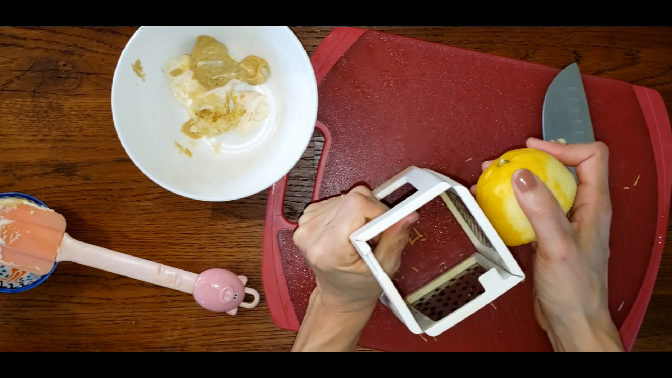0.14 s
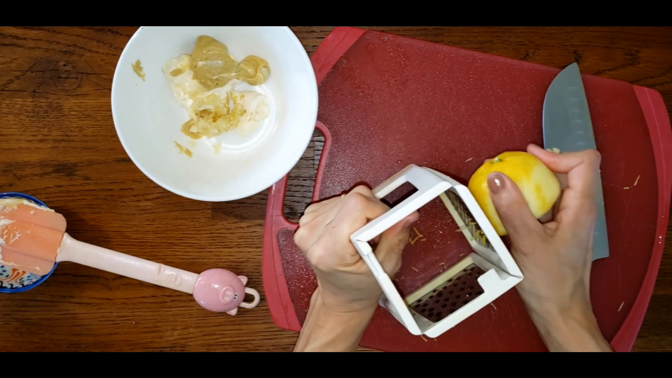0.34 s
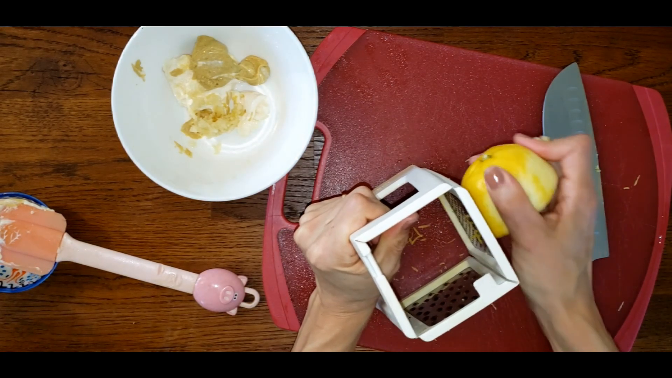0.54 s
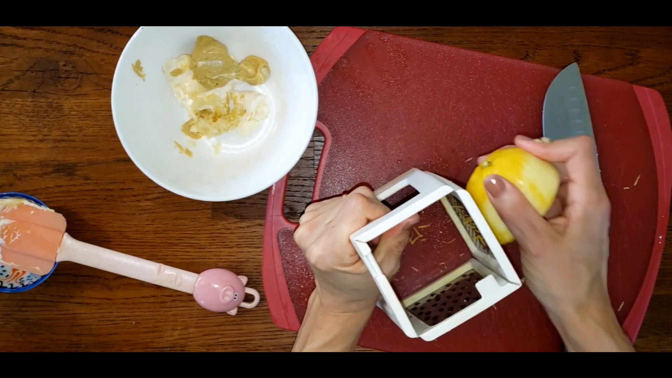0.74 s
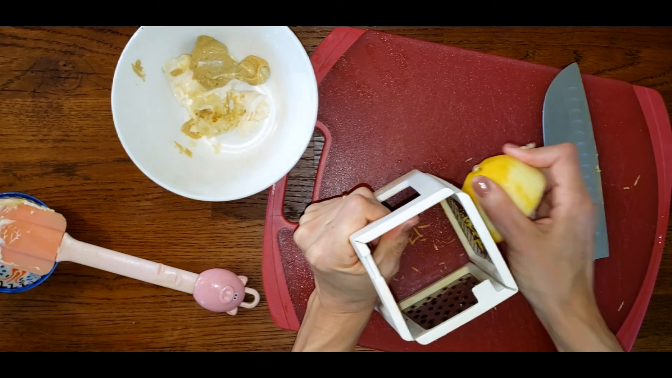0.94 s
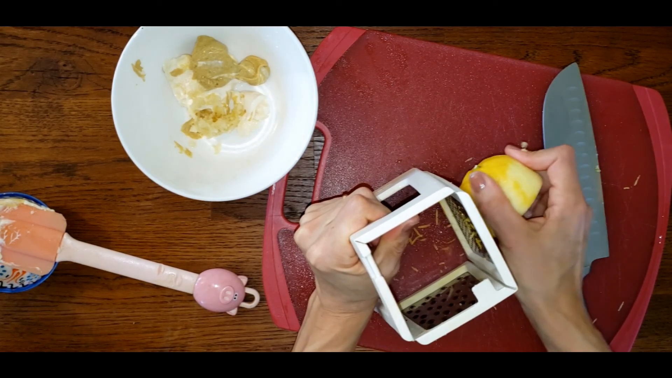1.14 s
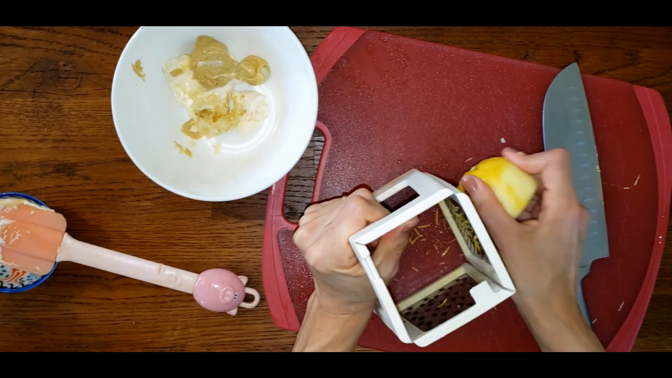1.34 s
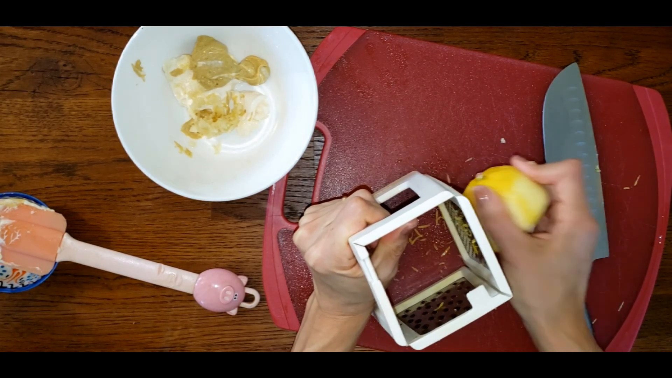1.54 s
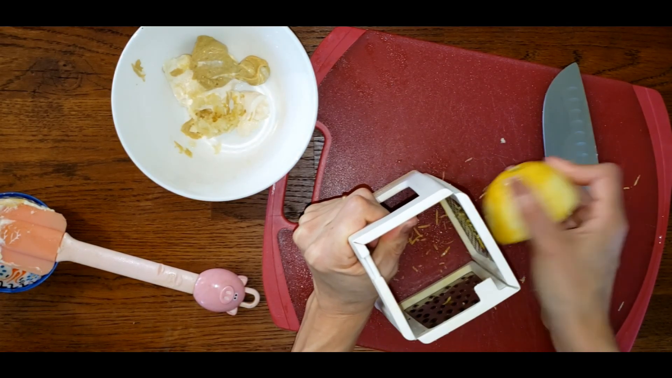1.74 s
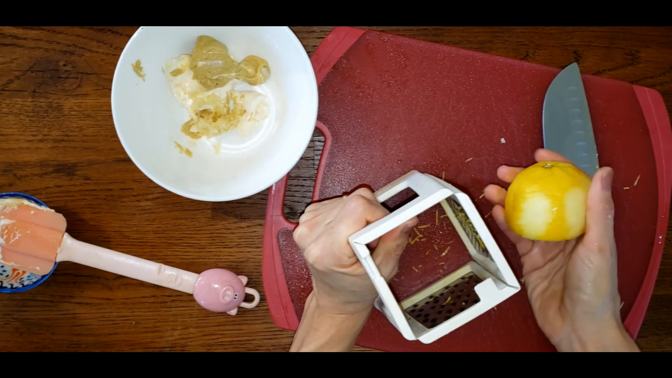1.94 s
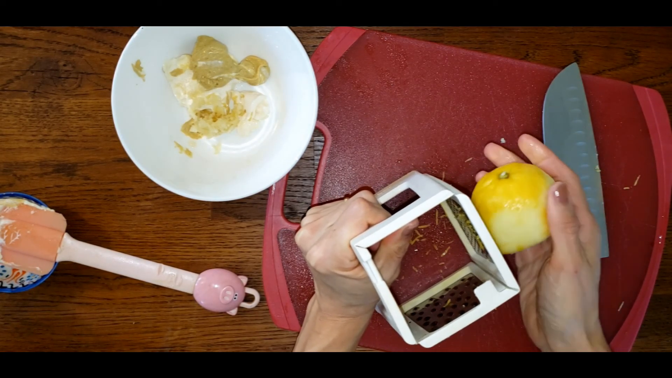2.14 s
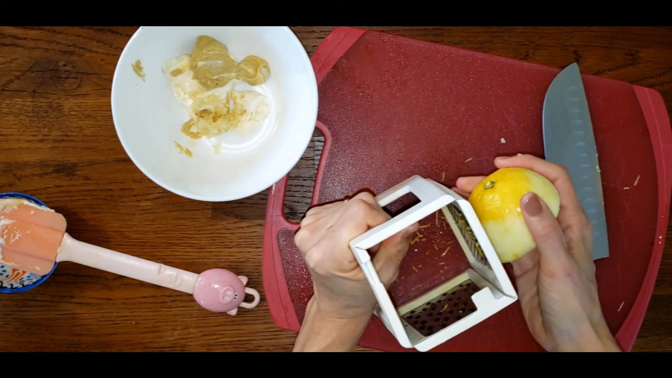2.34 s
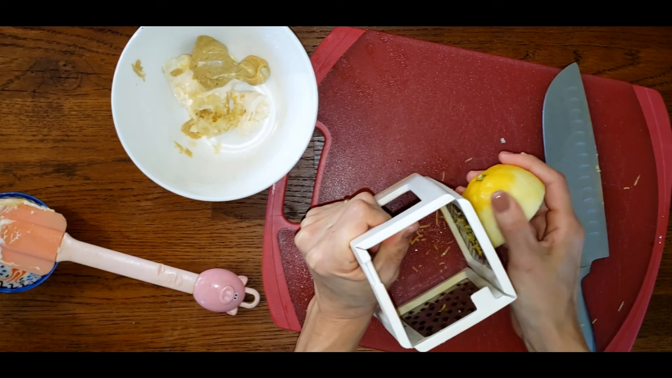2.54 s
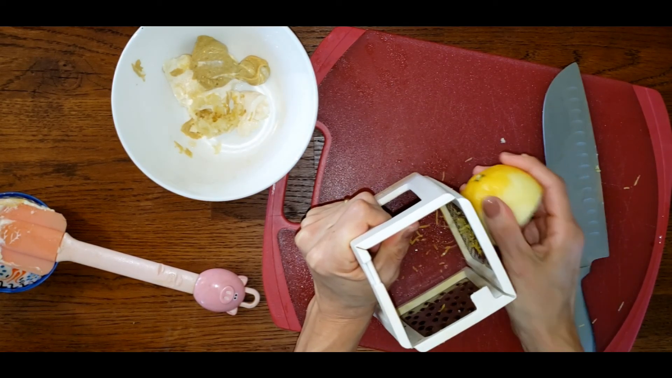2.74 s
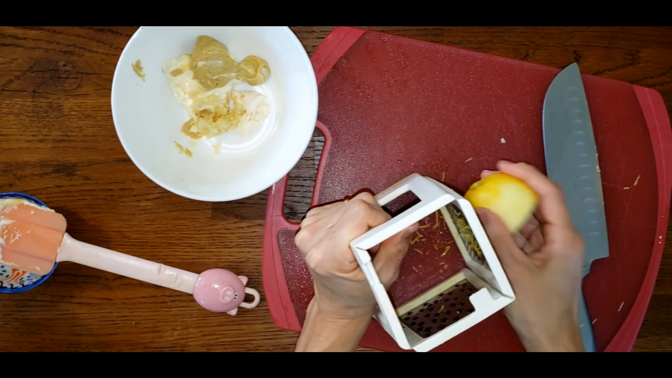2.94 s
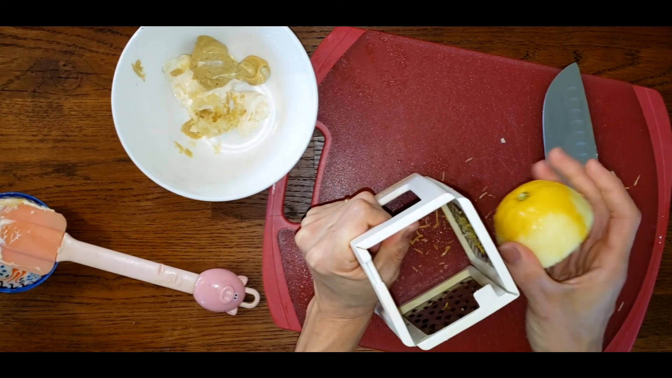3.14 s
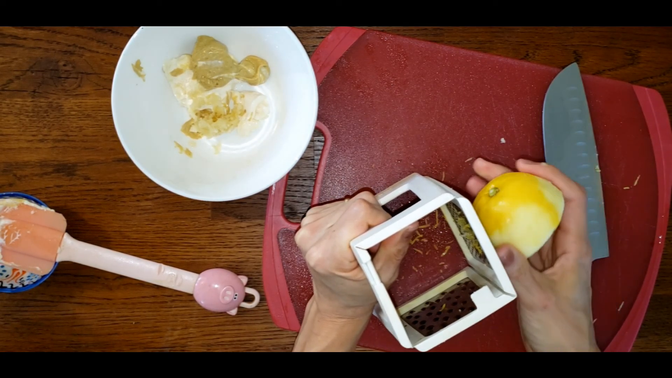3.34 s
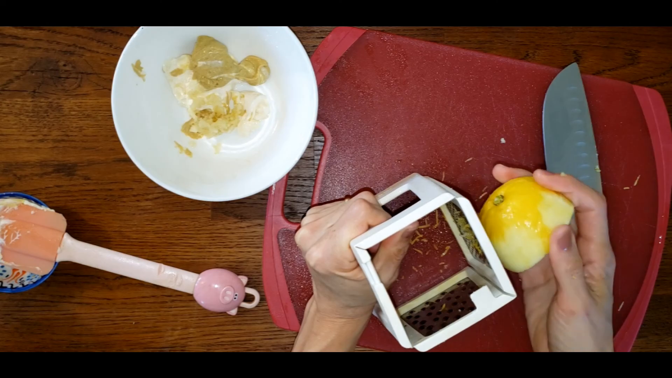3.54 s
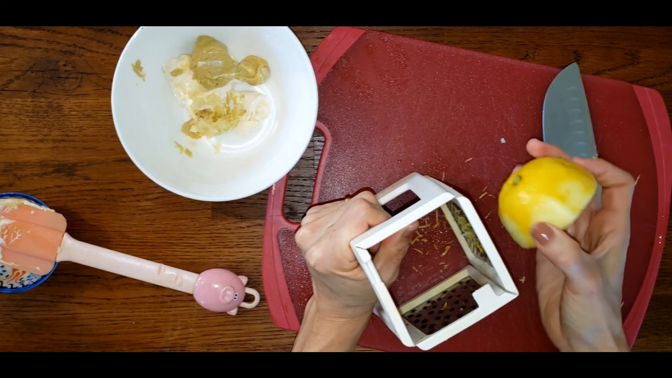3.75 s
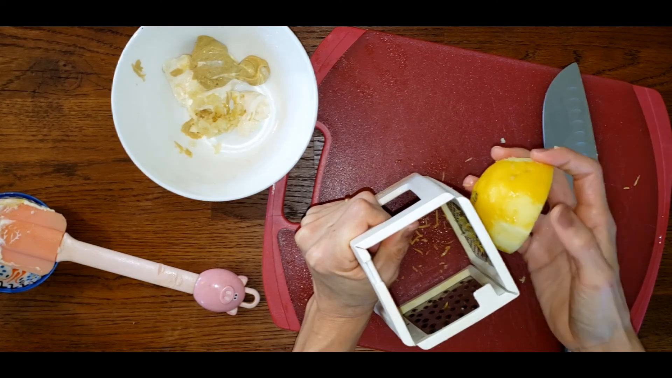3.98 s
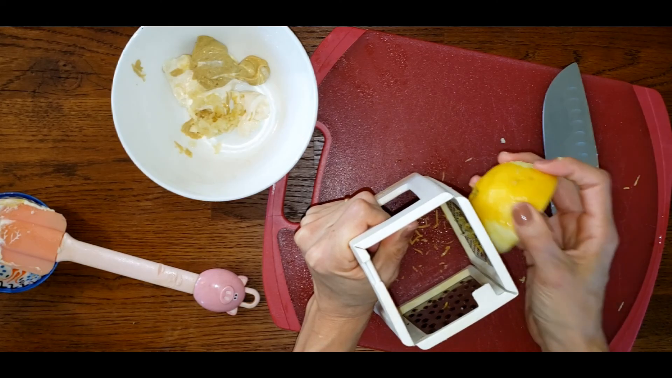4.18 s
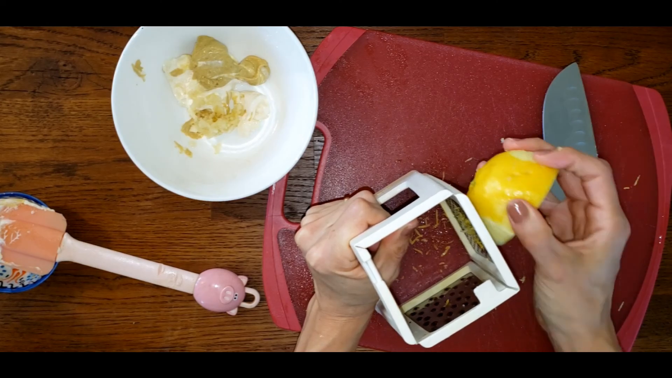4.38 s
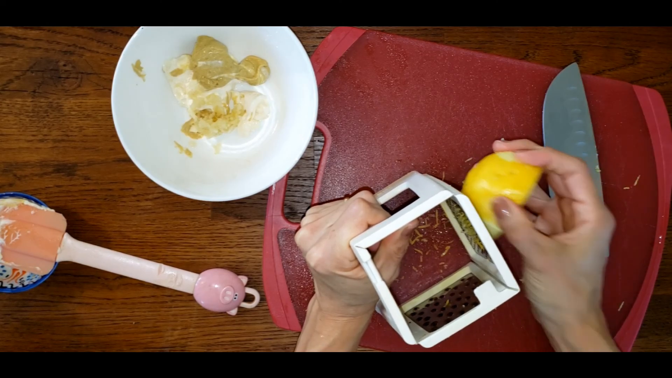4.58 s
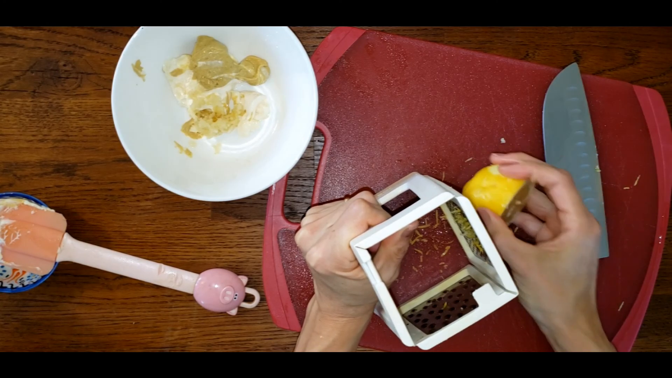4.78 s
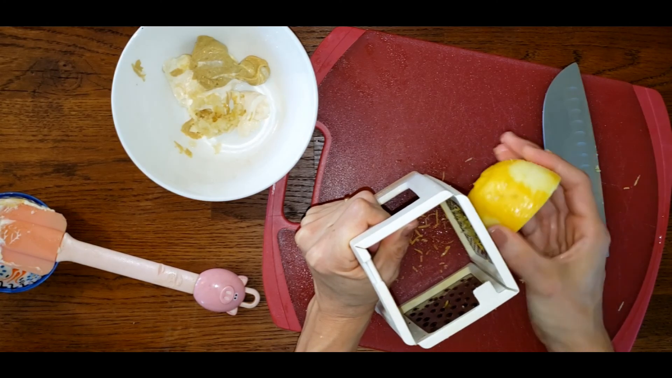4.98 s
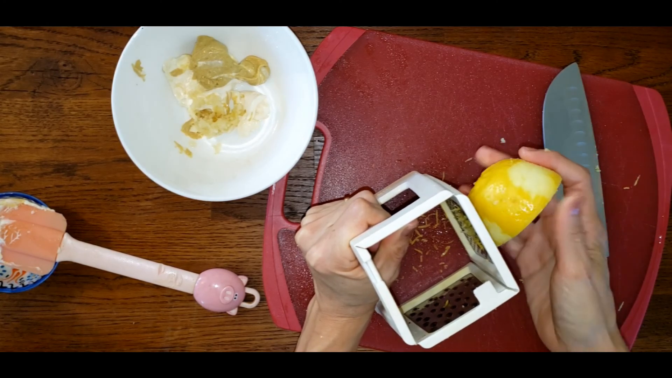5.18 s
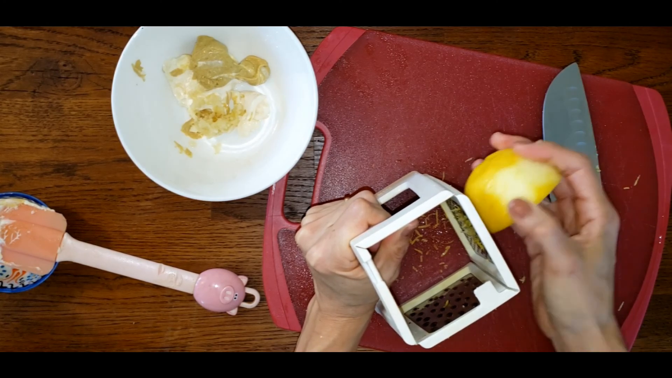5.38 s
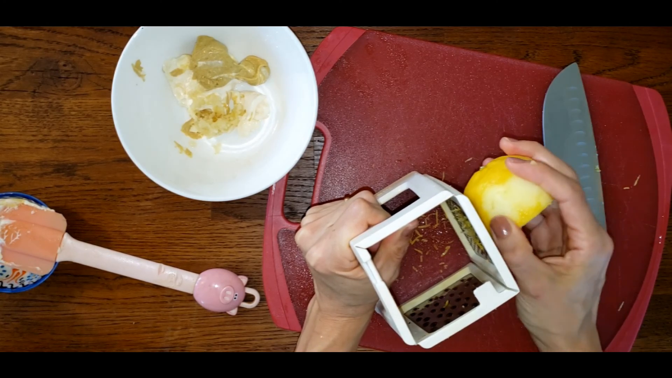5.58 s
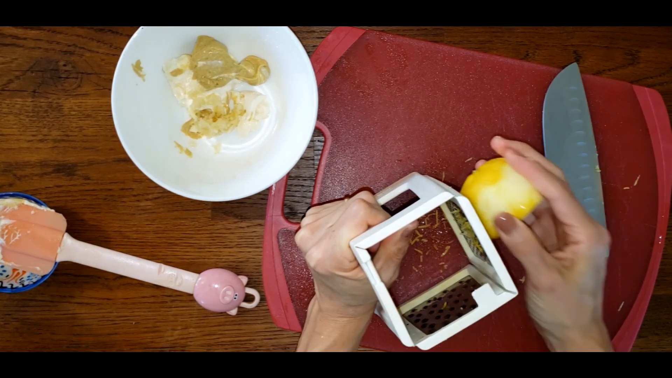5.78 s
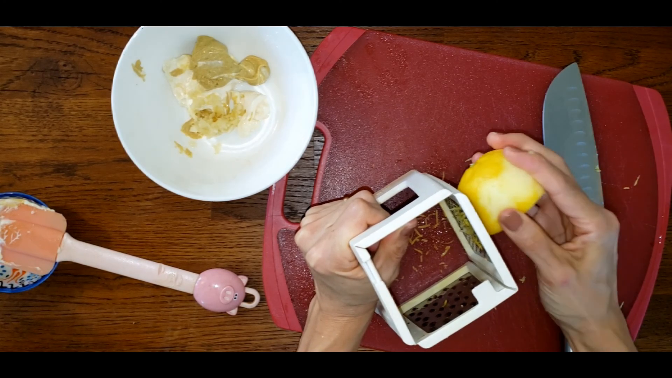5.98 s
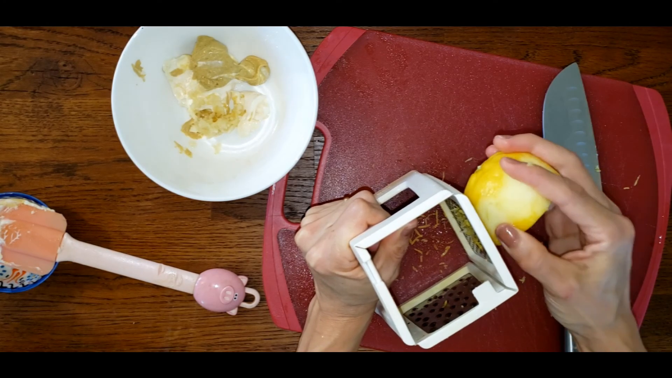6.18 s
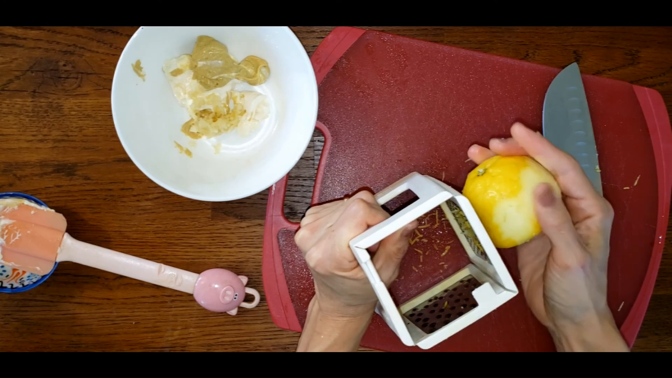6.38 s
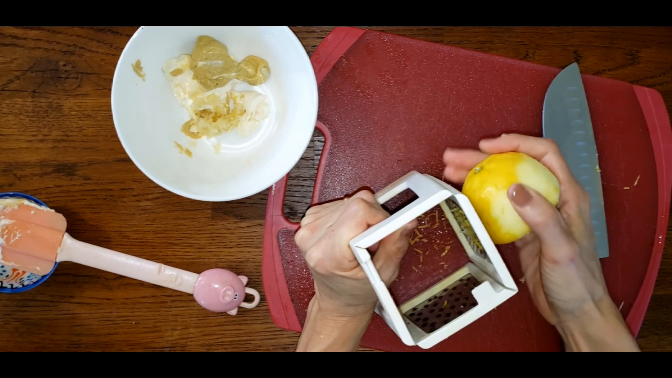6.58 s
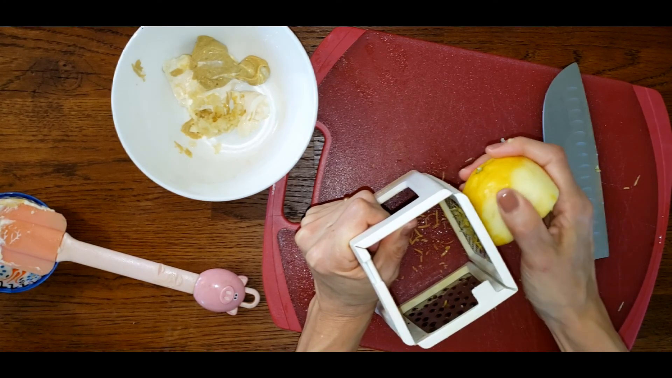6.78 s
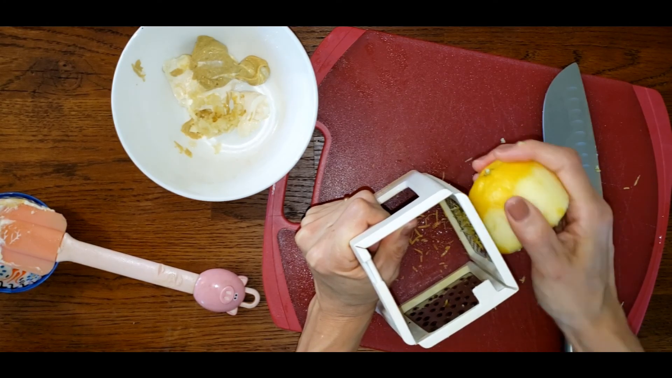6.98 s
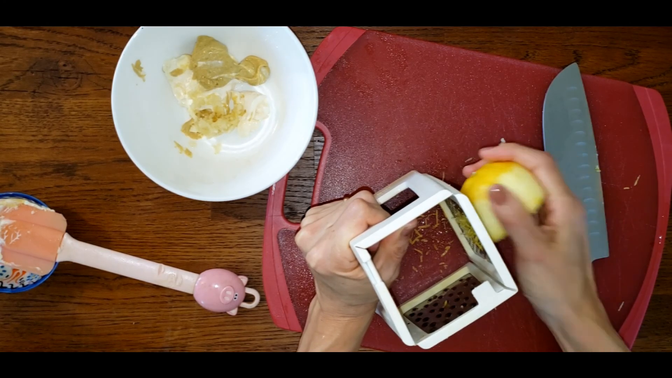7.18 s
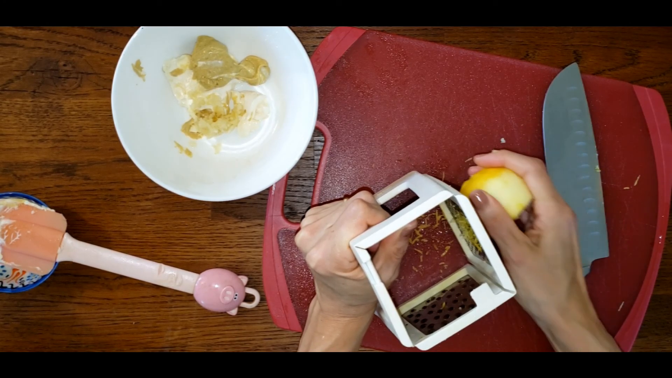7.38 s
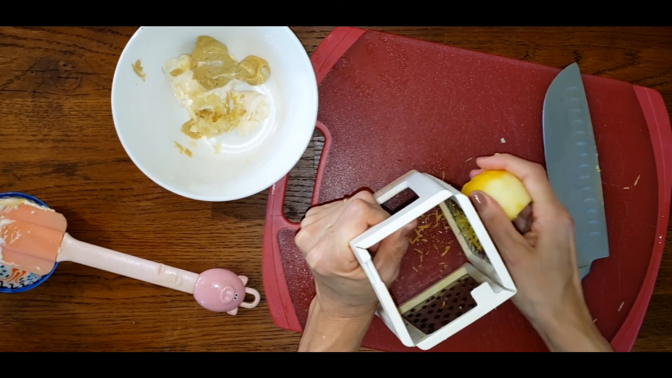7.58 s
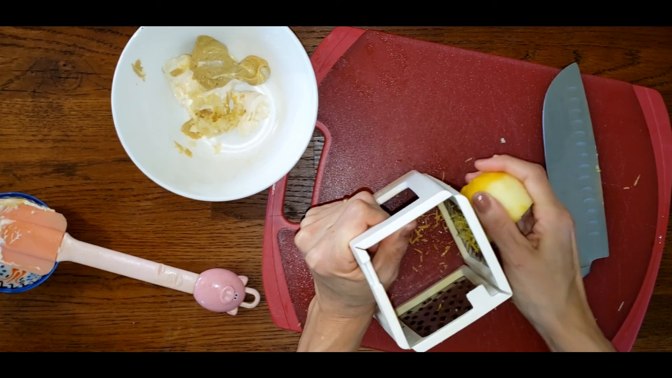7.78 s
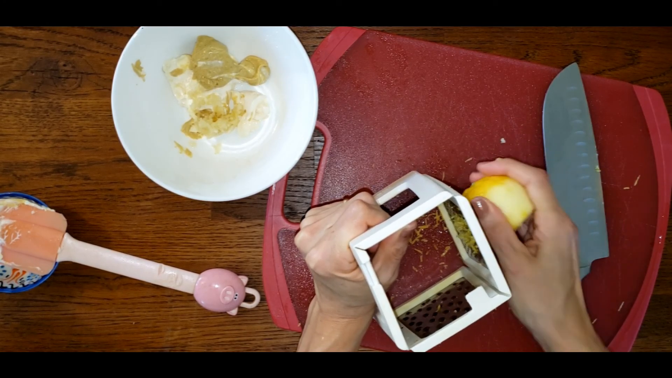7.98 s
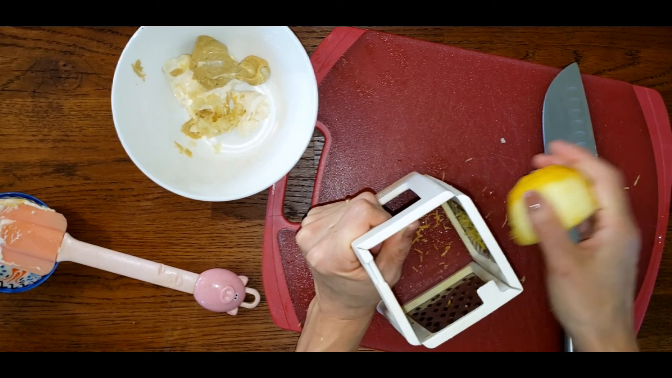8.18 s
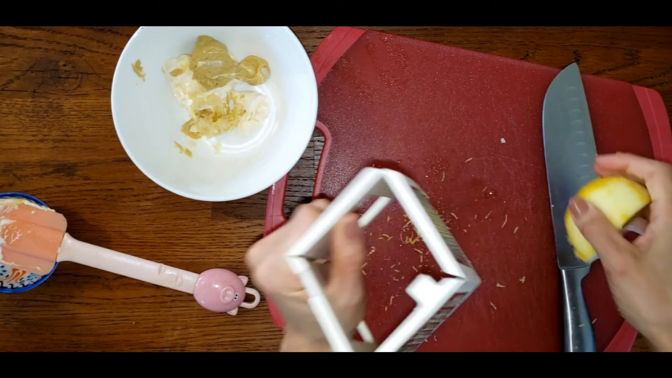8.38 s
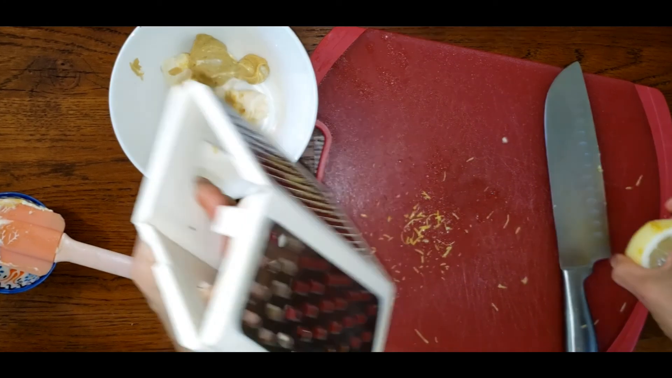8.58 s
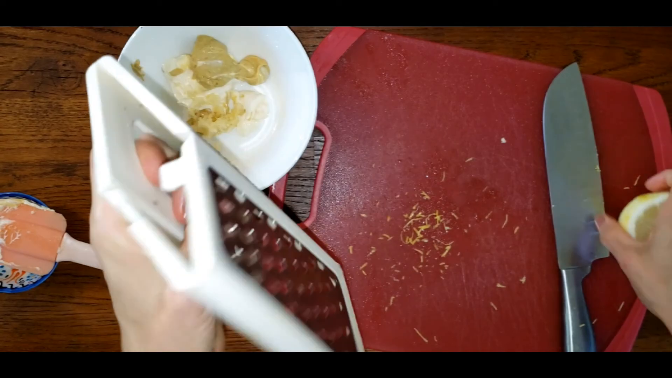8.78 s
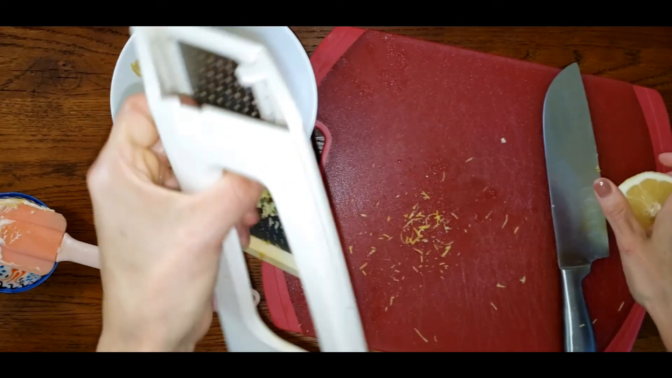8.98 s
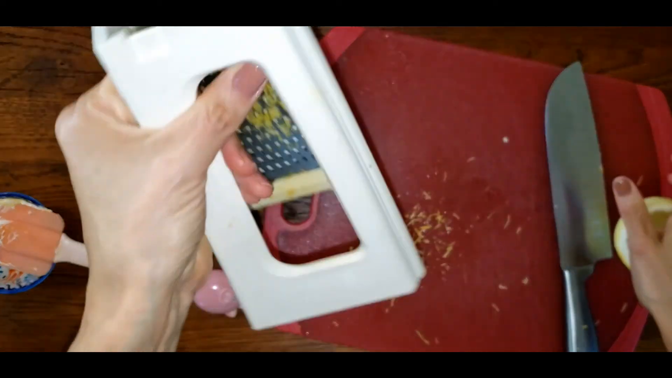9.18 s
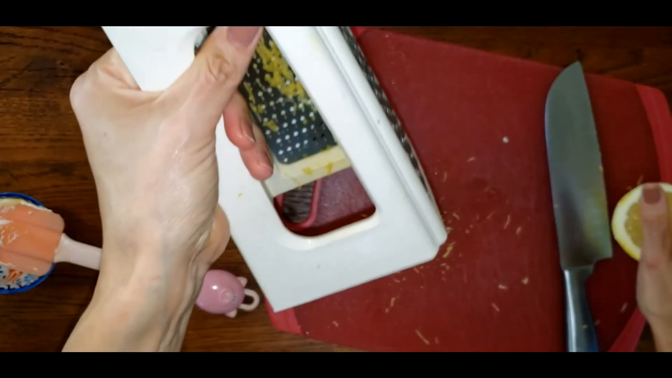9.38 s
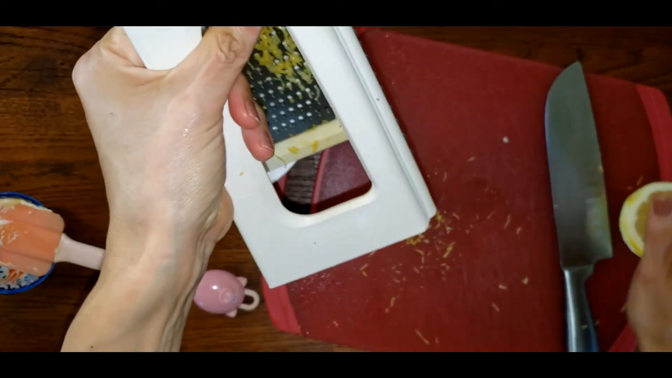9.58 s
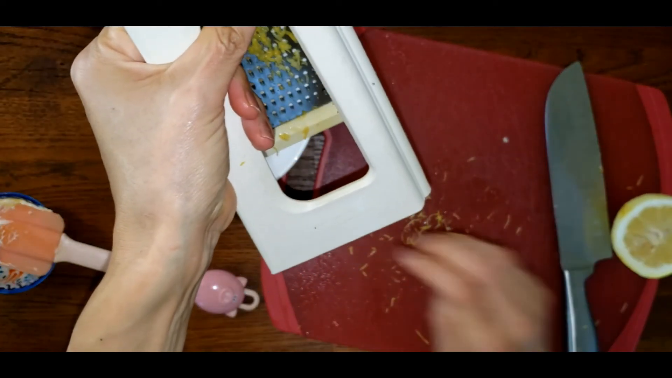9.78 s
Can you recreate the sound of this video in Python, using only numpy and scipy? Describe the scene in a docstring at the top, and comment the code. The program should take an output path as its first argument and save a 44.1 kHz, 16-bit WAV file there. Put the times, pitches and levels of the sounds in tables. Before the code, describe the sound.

Close, crisp scrapes of lemon rind against a steel grater come about four a second, in bursts broken by short pauses with soft bumps and sticky handling. The grater and the board beneath it resonate dully with each stroke. After the last run the fruit lands on the board with a single thud that rattles a knife, followed by a few light plastic ticks. Faint rumble, hiss and a fan tone fill the small kitchen.

```python
"""A lemon is zested on a box grater that stands on a plastic cutting board in a small kitchen.
In each stroke wet peel sticks, oil cells burst and the teeth tear the rind, while their tugging drives
the modes of box and board; the lemon then slides back lightly. Between bouts, fingers turn the fruit.
Near the end it lands on the board and jolts a knife into ringing; last, the grater's frame ticks.
Room rumble, hiss and a faint fan tone lie under it all."""
import sys
import numpy as np
from scipy import signal
from scipy.fft import rfft, irfft
from scipy.io import wavfile
from scipy.ndimage import uniform_filter1d

SR = 44100
rng = np.random.default_rng(int(sys.argv[2]) if len(sys.argv) > 2 else 0)


def store_pcm(level_fs):
    """Save levels as 16-bit WAV."""
    pcm = np.round(np.clip(level_fs, -1, 1) * 32767).astype(np.int16)
    wavfile.write(sys.argv[1], SR, np.atleast_2d(pcm).T)


N = 433503
TIME = np.arange(N) / SR

# strokes down the teeth: start_s, length_s, force_db, slide_back_force_db
STROKES = [(-.09, .15, -43, -75), (0.261, .17, -39, -60), (.594, .11, -31.3, -50.5),
           (0.849, 0.11, -30.5, -44), (1.096, .11, -30, -48), (1.34, .12, -26.3, -38.5),
           (1.576, 0.12, -28, -56), (2.495, .13, -34, -47), (2.733, .12, -27.5, -39.5),
           (2.948, 0.094, -25.5, -58), (4.257, .04, -34.5, -75), (4.294, .085, -29.8, -53),
           (4.506, 0.12, -27, -38), (4.738, .12, -27, -46.5), (5.668, .12, -38.5, -54.5),
           (6.024, .082, -33.3, -56), (6.831, 0.051, -33, -70), (6.872, .065, -31, -61),
           (7.097, 0.13, -25.5, -39), (7.344, .11, -25, -42), (7.567, .11, -27.5, -41),
           (7.789, .11, -27.5, -42), (8.001, 0.12, -26.5, -56)]
USUAL_FORCE_DB = -28
def stroke_drive(level_db, exponent, back_db, crest_shift, stretch, bite):
    """Power law: amplitude grows as a power of force, in each stroke and in its light slide back."""
    drive, back_after_s, back_s = np.zeros(N), .12, .12
    for start, length, force_db, back_force_db in STROKES:
        down = swell(start, stretch * length, .46 + crest_shift, bite)
        back = swell(start + back_after_s, stretch * back_s, .29 + crest_shift, bite)
        drive += from_db(exponent * (force_db - USUAL_FORCE_DB)) * down
        drive += from_db(exponent * (back_force_db - USUAL_FORCE_DB) + back_db) * back
    return from_db(level_db) * drive


def grating():
    """Stick-slip friction: teeth catch and release, breaking the peel and shaking its supports."""
    grip = catching(per_s=270, depth_db=2.5) * catching(per_s=55, depth_db=1.5)   # teeth, whole rows
    tugs = grains(per_s=900, spread_db=-.5, even_s=.011)
    fractures, rind = tearing_rind(grip)
    rasp = rind + bursting_cells(grip) + steel_plate(fractures)
    return hollow_box(tugs) + cutting_board(tugs), rasp


# spectrum of tearing rind: frequency_hz, level_db
RIND_SPECTRUM = [(500, 10), (850, -8.5), (1150, 0.5), (1650, 5), (2200, 2), (3200, 0), (4800, -3),
                 (6800, -12), (9000, -17.5), (16000, 1)]
def tearing_rind(grip):
    """Fracture noise: tiny breaks merge into a rasp. Returns the impulses and their sound."""
    drive = stroke_drive(-27.7, exponent=1, back_db=-.7, crest_shift=.01, stretch=1.05, bite=.22)
    fractures = crackle(grip * drive, per_s=5000, spread_db=2.5, scattered_db=1, pan_db=0)
    return fractures, from_db(1.5) * through(fractures, response(RIND_SPECTRUM))


# spectrum of a bursting oil cell: frequency_hz, level_db
CELL_SPECTRUM = [(3000, -19), (7000, -18), (8800, -10), (10500, -5), (12500, 0.5), (13800, -1),
                 (15000, -13), (16000, -5)]
def bursting_cells(grip):
    """Rupture under pressure: oil cells give a high fizz that peaks just before the tearing."""
    drive = stroke_drive(-31.1, exponent=1, back_db=1.2, crest_shift=-.05, stretch=.96, bite=.19)
    ruptures = crackle(grip * drive, per_s=3500, spread_db=3, scattered_db=5, pan_db=-13)
    return from_db(5) * through(ruptures, response(CELL_SPECTRUM))


# loudest snaps of the peel: start_s, level_db
PEEL_SNAPS = [(1.1044, -17), (2.5606, -8.5), (2.885, -13), (4.2697, -17), (4.3096, -6.5), (4.537, -18),
              (4.5511, -1), (4.7402, -13), (5.8367, -21.5), (6.0467, -9), (6.8473, -5.5), (7.366, -14),
              (8.0197, -12)]
def peel_snaps():
    """Collective rupture: a tooth rips out a whole cluster of oil cells at once."""
    cluster = butterworth(noise_burst(t60_s=.025, samples=SR // 25), 6500, "high")
    ruptures = through(clicks(PEEL_SNAPS), cluster)
    return from_db(-11) * place(through(ruptures, response(CELL_SPECTRUM)), pan_db=-15)


# modes of the toothed plate: pitch_hz, bandwidth_hz, level_db, pan_db, phase_difference_rad
PLATE_MODES = [(995, 57, -4.5, 8, 1), (1174, 20, -4, -11, -2), (1354, 92, -6.5, 3, -0.8),
               (1653, 95, -0.5, 7, -1.86), (1793, 69, -10, -8, 0.6), (1900, 15, -18.5, -9, -1.4),
               (2445, 58, -13.5, -11, -0.8)]
def steel_plate(fractures):
    """Resonance: the fractures at the teeth excite the modes of the steel."""
    return from_db(-8) * butterworth(through(fractures[1], resonator(PLATE_MODES)), 5200)


# modes of the grater's box: pitch_hz, bandwidth_hz, level_db, pan_db, phase_difference_rad
BOX_MODES = [(202.5, 12.4, -15.5, 14.5, 0.23), (222.8, 12.2, -5.5, 2, 0.33), (310, 18, -9, 0, -1.02),
             (325.3, 19.5, -16, -4, -1.7), (397, 24, -29.5, -13.5, -1.5), (486, 14, -21.5, -7.5, 0),
             (558, 110, -30.5, 11, -0.14), (604, 24, -19.5, 1.5, 0.16), (696.5, 34, -23.5, 11, 0.94),
             (743, 38, -25, 3, 0.44)]
def hollow_box(tugs, crossover_hz=520):
    """Forced vibration: tugs shake the box, whose upper modes speak even in light strokes."""
    lower = stroke_drive(-19, exponent=.8, back_db=-4, crest_shift=.04, stretch=1.0419, bite=.32)
    upper = stroke_drive(-18.2, exponent=.5, back_db=-10.5, crest_shift=-.05, stretch=1, bite=.36)
    shaking = butterworth(lower * tugs, crossover_hz, order=3)
    shaking += butterworth(upper * tugs, crossover_hz, "high", order=3)
    return from_db(2) * butterworth(through(shaking, resonator(BOX_MODES)), 756, order=8)


# modes of board and table: pitch_hz, bandwidth_hz, level_db, pan_db, phase_difference_rad
BOARD_MODES = [(77, 18, -16.5, -7, -3.5), (94.4, 17.6, -1, 3, -0.54), (122.2, 14.3, -5.5, -2, 0.33)]
def cutting_board(tugs):
    """Structure-borne sound: the tugs pass into board and table, which radiate a low thump."""
    drive = stroke_drive(-15.5, exponent=.78, back_db=-3.5, crest_shift=.02, stretch=1.1238, bite=.2)
    return from_db(.2) * butterworth(through(drive * tugs, resonator(BOARD_MODES)), [58, 170], "band")


# peel shifting against fingers and steel: start_s, length_s, level_db
FINGER_SHIFTS = [(.19, .09, -55), (.46, .15, -54), (2.203, .2, -57), (3.273, 0.23, -52),
                 (3.569, .14, -46.5), (3.87, .36, -59), (4.953, .22, -56), (5.844, 0.12, -41),
                 (6.257, 0.086, -46.5), (6.33, 0.43, -52.5), (6.747, 0.35, -48), (8.227, 0.19, -54),
                 (8.66, 0.055, -55)]
def wet_peel(silent_at_s=9.2):
    """Adhesion: wet peel crackles as it is held, turned and pressed on before each stroke."""
    fade = np.clip((silent_at_s - TIME) / .28, 0, 1)
    held = from_db(-62.5) * fade * catching(per_s=21, depth_db=3.5)
    turned = sum(from_db(db) * swell(start, length, crest=.25) for start, length, db in FINGER_SHIFTS)
    pressed = sum(from_db(-45 + force_db - USUAL_FORCE_DB) * swell(start - .045, .07, crest=.65)
                  for start, _, force_db, _ in STROKES)
    sticking = crackle(held + turned + pressed, per_s=960, spread_db=3.5, scattered_db=-2.5, pan_db=-17)
    return from_db(-5.5) * through(sticking, response(CELL_SPECTRUM))


# fruit and hand bumping the grater: start_s, length_s, level_db, cutoff_hz
SOFT_BUMPS = [(.099, .025, -29.5, 900), (2.194, 0.026, -37, 200), (3.292, 0.075, -29, 210),
              (3.594, 0.12, -40.5, 500), (3.925, .06, -28.5, 206), (4.215, .049, -34, 250),
              (5.476, .11, -31.5, 280), (5.851, 0.093, -30, 280), (6.08, .04, -21, 120),
              (6.476, .055, -43, 250), (8.281, .045, -30, 570)]
def soft_bumps(crest=.37):
    """Compliant contact: bumps and the bracing hand excite only the low modes of box and board."""
    contact = grains(per_s=2200, spread_db=2.5, even_s=.012)
    bracing = from_db(-42.5) * sum(swell(start - .13, .44, crest) for start, *_ in STROKES)
    force = butterworth(bracing * contact, 250)
    for start, length, db, cutoff_hz in SOFT_BUMPS:
        force += butterworth(from_db(db) * swell(start, length, crest) * contact, cutoff_hz)
    board = from_db(7) * through(force, resonator(BOARD_MODES))
    box = from_db(4) * through(force, resonator(BOX_MODES))
    return butterworth(board + box, 870, order=4)


# the lemon lands and settles: start_s, level_db
LANDING_BLOWS = [(8.8465, -26.5), (8.8515, -14), (8.8635, -15)]
# modes of the struck board: pitch_hz, level_db, t60_s
THUD_MODES = [(94.4, -5, 0.28), (237, 1.5, 0.17), (314.5, 4.5, 0.17), (366, -6, 0.23), (422, -16, 0.175),
              (483, -15.5, 0.22), (649, -7.5, 0.2), (676, -17, 0.18), (736, -9, 0.14)]
def lemon_landing():
    """Impact excitation: the fruit sets the board into briefly ringing free vibration."""
    thud = butterworth(through(clicks(LANDING_BLOWS), free_ring(THUD_MODES)), 1900)
    return from_db(2) * place(thud, pan_db=6.5)


# modes of the knife blade: pitch_hz, level_db, t60_s
BLADE_MODES = [(3400, -33, .15), (4340, -21.5, .14), (4462, -24.5, 0.18), (5076, -26, .21),
               (5270, -39, .15)]
# spectrum of the knife's chatter: frequency_hz, level_db
CHATTER_SPECTRUM = [(100, 1), (400, 11.5), (750, 3), (1100, -10), (1800, -6), (3500, -6.5), (6000, -22),
                    (8000, -24), (12000, -24.5), (16000, -42)]
def jolted_knife():
    """Shock transmission: the first two blows of the landing make the knife chatter and ring."""
    jolts = clicks(LANDING_BLOWS[:2])
    contacts = through(jolts, noise_burst(t60_s=.19, samples=SR // 2))
    chatter = from_db(-1) * through(contacts, response(CHATTER_SPECTRUM))
    ring = from_db(9.5) * through(jolts, free_ring(BLADE_MODES))
    return place(ring + chatter, pan_db=-4)


# ticks of the grater's plastic frame: start_s, level_db
FRAME_TICKS = [(9.07, -31.5), (9.195, -41), (9.215, -43)]
# spectrum of a tick: frequency_hz, level_db
TICK_SPECTRUM = [(400, -17), (1600, -1), (2050, 11.5), (2800, -8), (3800, -15), (6000, -35), (16000, -52)]
# modes of the frame: pitch_hz, level_db, t60_s
FRAME_MODES = [(1930, -15, .06), (2060, -20, .04)]
def frame_ticks():
    """Transient excitation: each slip of the frame in the hand gives a tick and a damped ping."""
    impulses = clicks(FRAME_TICKS)
    slips = through(impulses, noise_burst(t60_s=.04, samples=SR // 10))
    tick = from_db(-1) * through(slips, response(TICK_SPECTRUM))
    ping = from_db(12) * through(impulses, free_ring(FRAME_MODES))
    return place(tick + ping, pan_db=4)


# reverberation time of the kitchen: frequency_hz, t60_s
KITCHEN_DECAY = [(100, 0.43), (500, 0.37), (2000, 0.43), (6000, 0.3), (15000, 0.22)]
def kitchen(sound):
    """Diffuse reverberation: reflections even out the two sides and decay band by band."""
    t, tail = TIME[:SR // 2], 0
    edges_hz = np.geomspace(40, 18000, 10)
    for low, high in zip(edges_hz, edges_hz[1:]):
        band = butterworth(rng.standard_normal((2, len(t))), [low, high], "band")
        tail += band * from_db(-60 * t / at_hz(KITCHEN_DECAY, np.sqrt(low * high)))
    tail *= np.clip(t / .0099 - .5, 0, 1)   # reflections build up after the direct sound
    blended = sound + .19 * (sound[::-1] - sound)
    return through(blended, tail / np.sqrt(np.sum(tail ** 2) / 2))


# spectral density of the room noise: frequency_hz, left_db, right_db
NOISE_SPECTRUM = [(20, -70, -69), (47.3, -59, -62.5), (95, -62, -63), (173, -70, -69), (474, -74, -73.5),
                  (680, -85, -84), (1074, -80.5, -86), (1174, -88, -91), (1984, -80.5, -101),
                  (2500, -103, -106), (4860, -109, -111), (7860, -118, -117), (12200, -110, -106),
                  (15800, -112, -108)]
def room_noise(size=8192):
    """Spatial coherence: long waves of rumble reach both sides alike, short waves of hiss do not."""
    hz, table = np.fft.rfftfreq(size, 1 / SR), np.array(NOISE_SPECTRUM)
    coherence = at_hz([(100, .91), (500, .7), (1500, .03)], hz)
    shared, noise = rng.standard_normal(N), np.zeros((2, N))
    for side in (0, 1):
        gain = from_db(at_hz(table[:, [0, side + 1]], hz)) * np.sqrt(SR / 2)
        for source, share in ((shared, coherence), (rng.standard_normal(N), 1 - coherence)):
            kernel = np.fft.fftshift(irfft(gain * np.sqrt(share)))
            noise[side] += signal.oaconvolve(source, kernel, "same")
    return from_db(-.5) * noise


def fan(pitch_hz=731, bandwidth_hz=8.9):
    """Narrow-band noise: a faint, wavering fan tone that swells once."""
    tone = through(rng.standard_normal(N), resonator([(pitch_hz, bandwidth_hz, 0, -3, .99)]))
    return (from_db(-59) + from_db(-51.5) * swell(5.06, .27, crest=.4)) * tone


def swell(start_s, length_s, crest, bite=.21):
    """Envelope: a quick onset set by bite, a peak at the fraction crest of the length, a release."""
    envelope = np.zeros(N)
    span = slice(max(int(start_s * SR), 0), max(int((start_s + length_s) * SR), 1))
    age = TIME[span] - start_s
    rise = np.interp(age / length_s, [0, crest, 1], [bite, 1, 0])
    envelope[span] = np.sin(np.pi / 2 * rise) ** 2 * np.sqrt(np.clip(age / .012, 0, 1))
    return envelope


def catching(per_s, depth_db):
    """Random amplitude modulation: the grip tightens and slackens; unit RMS."""
    steps = np.clip(rng.standard_normal(N // 20), -2, 2)
    grip = from_db(depth_db * np.interp(TIME * per_s, np.arange(len(steps)), steps))
    return grip / np.sqrt(np.mean(grip ** 2))


def grains(per_s, spread_db, even_s):
    """Poisson process: impulses of uneven size, their mean power held steady over even_s."""
    impulses, onsets = np.zeros(N), np.flatnonzero(rng.random(N) < per_s / SR)
    draw = rng.uniform(-1, 1, N)[onsets]
    impulses[onsets] = np.sign(draw) * from_db(spread_db * np.minimum(-np.log(np.abs(draw)), 5))
    power = uniform_filter1d(impulses ** 2, int(even_s * SR))
    return impulses / np.sqrt(np.maximum(power, 1e-4))


def crackle(force, per_s, spread_db, scattered_db, pan_db):
    """Scattering: some snaps reach both sides directly, others leave the box toward one side only."""
    direct = place(force * grains(per_s, spread_db, even_s=.045), pan_db)
    scattered = np.array([force * grains(2 * per_s, spread_db, even_s=.047) * from_db(side_db)
                          for side_db in (pan_db, 0)])
    scattered /= np.sqrt((1 + from_db(2 * pan_db)) / 2)
    share = from_db(scattered_db)
    return (direct + share * scattered) / np.sqrt(1 + share ** 2)


def clicks(rows):
    """Impulse train: one sample for each row of start_s, level_db."""
    impulses = np.zeros(N)
    for start, db in rows:
        impulses[round(start * SR)] += from_db(db)
    return impulses


def noise_burst(t60_s, samples):
    """Exponential decay of white noise."""
    return rng.standard_normal(samples) * from_db(-60 * TIME[:samples] / t60_s)


def free_ring(modes):
    """Free vibration: a struck object rings as a sum of damped sines."""
    t = TIME[:SR // 2]
    return sum(from_db(db - 60 * t / t60) * np.sin(2 * np.pi * hz * t) for hz, db, t60 in modes)


def resonator(modes):
    """Modal superposition: each mode has its own level and phase per side; unit mean energy."""
    t, sides, ring = TIME[:SR // 3], np.array([[.5], [-.5]]), 0
    for hz, bandwidth, db, pan_db, phase in modes:
        envelope = bandwidth * from_db(db + sides * pan_db) * np.exp(-np.pi * bandwidth * t)
        ring += envelope * np.cos(2 * np.pi * hz * t + sides * phase)
    return ring / np.sqrt(np.sum(ring ** 2) / 2)


def response(spectrum, size=4096):
    """Minimum phase: the shortest causal ring with this spectral shape; unit energy."""
    gain = from_db(at_hz(spectrum, np.fft.rfftfreq(size, 1 / SR)))
    cepstrum = irfft(np.log(gain))
    cepstrum[1:size // 2] *= 2
    cepstrum[size // 2 + 1:] = 0
    ring = irfft(np.exp(rfft(cepstrum)))
    return ring / np.linalg.norm(ring)


def place(sound, pan_db, lag_s=.00016):
    """Time and level difference: the left side lags, and its level is pan_db relative to the right."""
    right = sound.ravel()
    left = np.interp(TIME - lag_s, TIME, right) * from_db(pan_db)
    return np.array([left, right]) / np.sqrt((1 + from_db(2 * pan_db)) / 2)


def through(sound, ring):
    """Convolution with a mono or stereo impulse response."""
    return signal.oaconvolve(np.atleast_2d(sound), np.atleast_2d(ring), axes=1)[:, :N]


def butterworth(sound, hz, kind="low", order=2):
    """Maximally flat filter, low-pass by default."""
    return signal.sosfilt(signal.butter(order, hz, kind, fs=SR, output="sos"), sound + 1e-18)


def at_hz(points, hz):
    """Interpolation on a log-frequency axis."""
    frequencies, values = np.transpose(points)
    return np.interp(np.log(np.maximum(hz, 1)), np.log(frequencies), values)


def from_db(db):
    """Amplitude ratio of a level."""
    return 10 ** (np.asarray(db) / 20)


def scene():
    """Superposition: direct sound, its reverberation and the background add."""
    rumble, rasp = grating()
    peel = wet_peel()
    low = rumble + soft_bumps()
    bright = rasp + peel + peel_snaps() + frame_ticks()
    knock = lemon_landing() + jolted_knife()
    reflected = kitchen(from_db(-12.5) * low + from_db(-6.5) * bright + from_db(-11.5) * knock)
    return low + bright + knock + reflected + room_noise() + fan()


def record(dry):
    """Band limiting and soft saturation: deep bass and top treble are cut, high peaks rounded."""
    dry = butterworth(dry, 40, "high", order=3)
    rounded = dry / (1 + (dry / .95) ** 8) ** (1 / 8)
    return signal.sosfilt(signal.ellip(12, .2, 80, 15800, fs=SR, output="sos"), rounded)


dry = scene()
out = record(dry)
store_pcm(out)
```